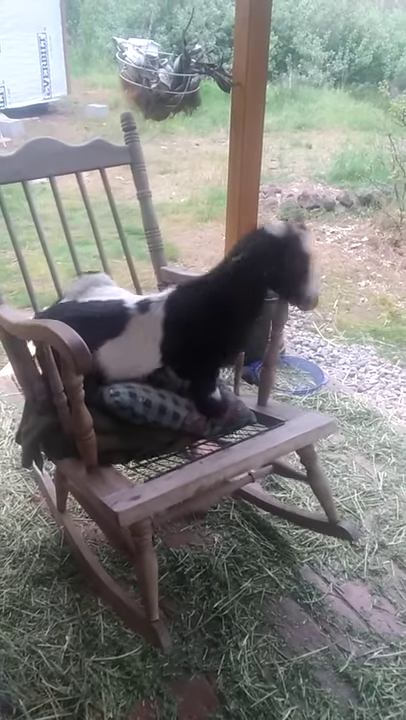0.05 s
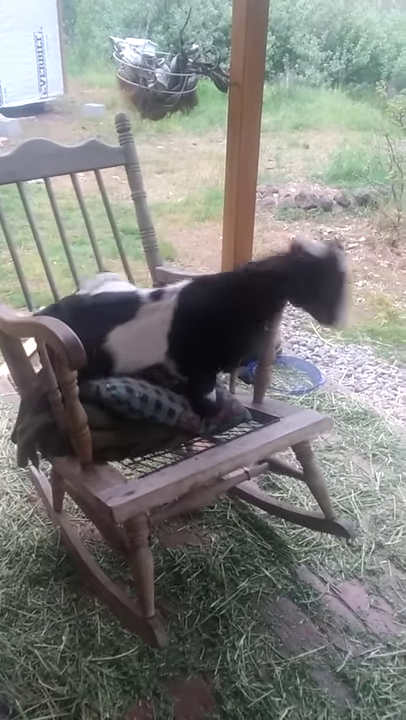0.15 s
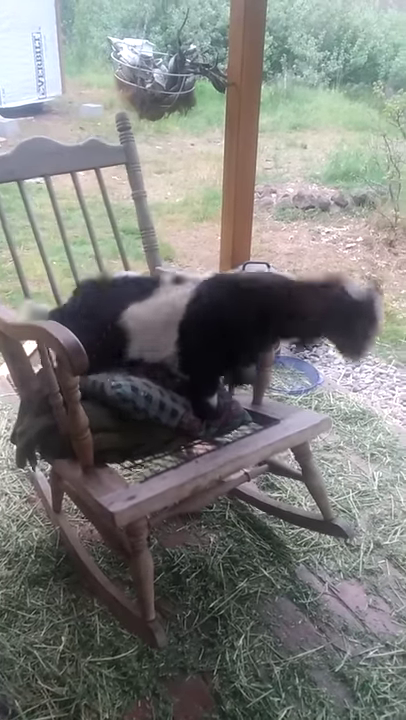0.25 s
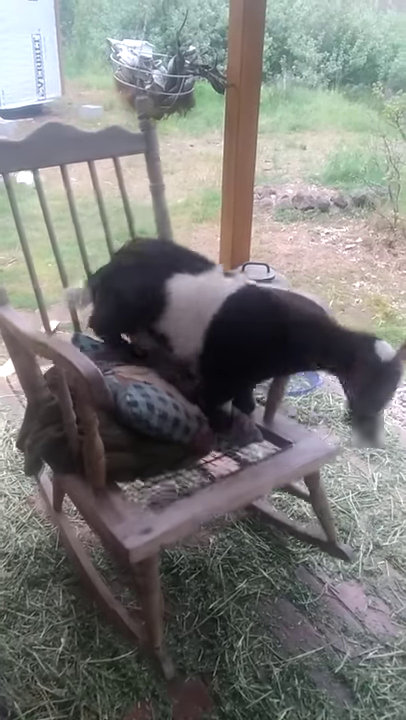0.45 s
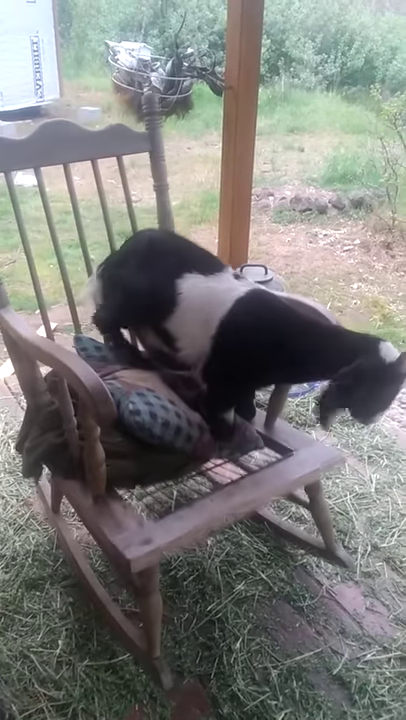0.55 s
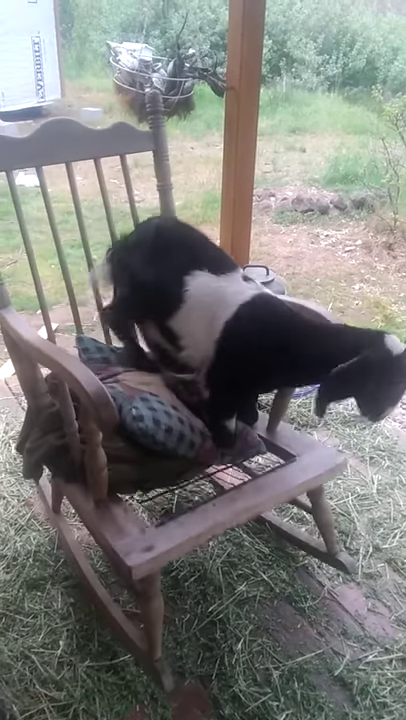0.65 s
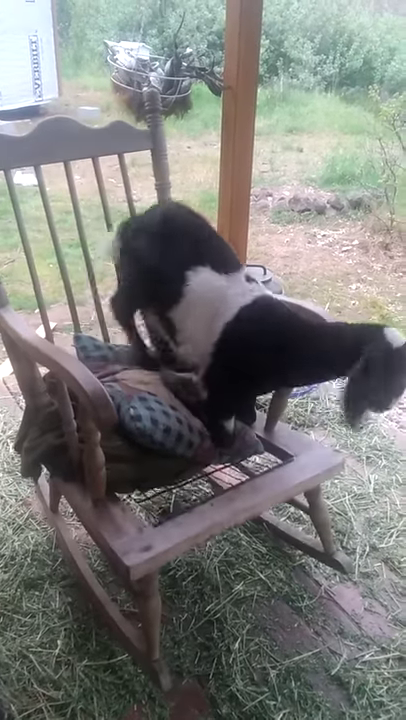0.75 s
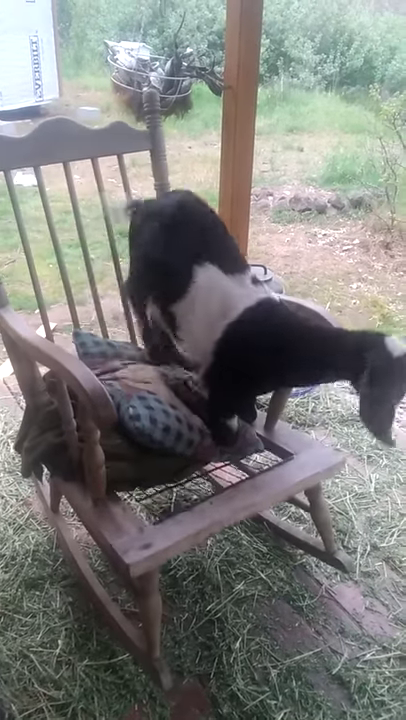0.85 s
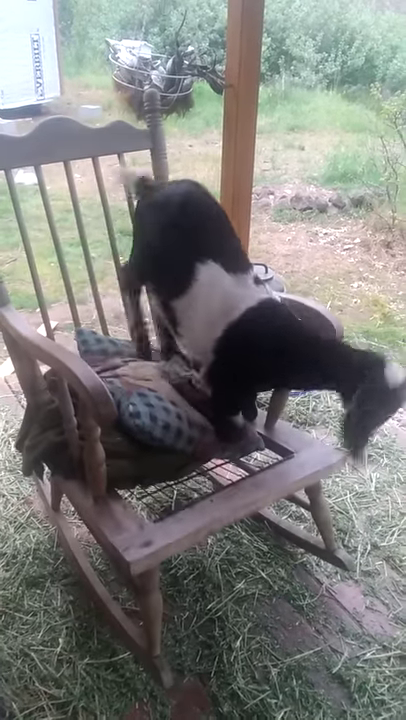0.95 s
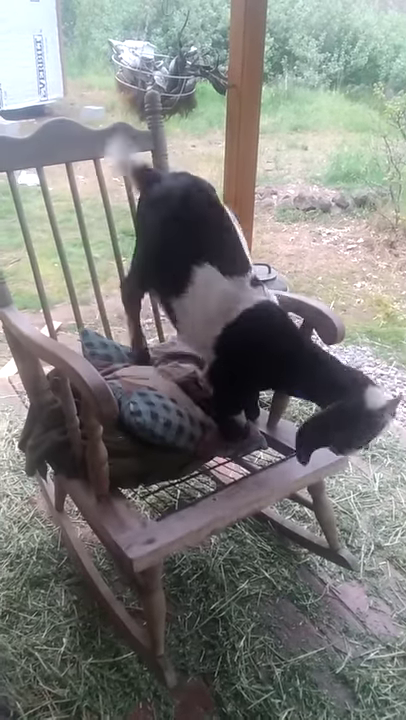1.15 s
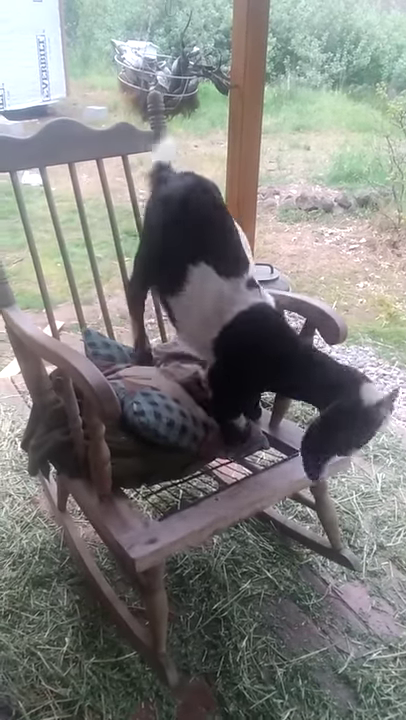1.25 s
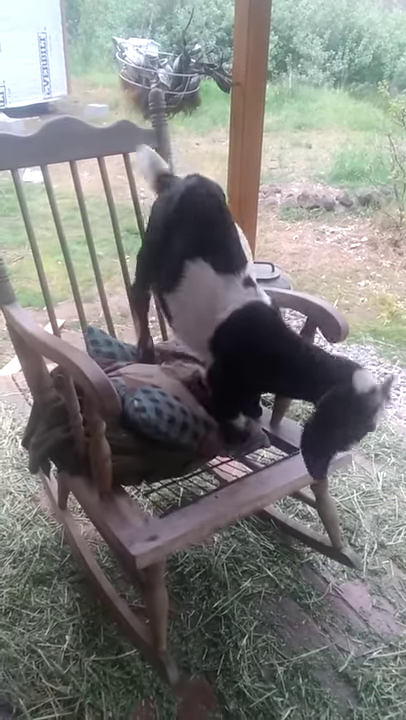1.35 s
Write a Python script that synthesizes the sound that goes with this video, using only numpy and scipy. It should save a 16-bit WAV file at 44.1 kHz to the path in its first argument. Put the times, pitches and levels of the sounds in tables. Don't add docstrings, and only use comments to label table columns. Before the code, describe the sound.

Goat hooves clatter hard on a wooden rocking chair, then small ticks and creaks amid steady crickets.

```python
import sys
import numpy as np
from scipy import signal
from scipy.fft import rfft, irfft
from scipy.io import wavfile

SR = 44100
rng = np.random.default_rng(int(sys.argv[2]) if len(sys.argv) > 2 else 0)


def field_ratio(decibels):
    return 10 ** (np.asarray(decibels, dtype=float) / 20)


def put_to_file(sound):
    columns = np.atleast_2d(sound).T
    safe = np.clip(columns, -1, 1)
    whole_steps = np.round(safe * 32767)
    wavfile.write(sys.argv[1], SR, whole_steps.astype(np.int16))


N = 61739
T = np.arange(N) / SR


def rms_one(x):
    return x / np.sqrt(np.mean(x ** 2) + 1e-20)


def curve(rows):
    return field_ratio(np.interp(T, *np.transpose(rows)))


def band(x, low_hz, high_hz, order=2):
    return signal.sosfilt(signal.butter(order, [low_hz, high_hz], "band", fs=SR, output="sos"), x)


def resonate(x, modes, order=1):
    out = 0
    for k, (pitch_hz, width_hz, level_db) in enumerate(modes):
        r = np.exp(-np.pi * max(width_hz, 8) / SR)
        poles = [1, -2 * r * np.cos(2 * np.pi * pitch_hz / SR), r * r]
        y = x
        for _ in range(order):
            y = signal.lfilter([1, 0, -1], poles, y) * (1 - r * r) / 2
        out = out + (-1) ** k * field_ratio(level_db) * y
    return out


# pitch_hz, density_db [dB per Hz]
HUSH_SPECTRUM = [(88, -30), (150, -7.5), (244, -12), (735, -11.5), (1950, -22.5), (4200, -33.5),
                 (5460, -60), (9240, -120)]


def hush():
    hz, density_db = np.transpose(HUSH_SPECTRUM)
    f = np.maximum(np.fft.rfftfreq(N, 1 / SR), 1)
    gain = field_ratio(np.interp(np.log(f), np.log(hz), density_db)) * (f < 6000)
    return field_ratio(-77.5) * rms_one(irfft(rfft(rng.standard_normal(N)) * gain, N))


# time_s, level_db
CHORUS = [(0, -49), (.13, -65.5), (.22, -69.5), (.33, -57.5), (.52, -64), (.65, -72), (.85, -59.5),
          (1.0, -73.5), (1.1, -75), (1.15, -52), (1.27, -72.5), (1.4, -59.5)]


def far_chorus():
    return curve(CHORUS) * field_ratio(0.5) * rms_one(band(rng.standard_normal(N), 5150, 5438, order=3))


# time_s, level_db
LOAD = [(0, -78.5), (.13, -91), (.18, -57.5), (.3, -40), (.45, -52), (.62, -54), (.75, -59), (.95, -64.5),
        (1.18, -64), (1.25, -58), (1.33, -40.5), (1.4, -57.5)]
# pitch_hz, width_hz, level_db
GROUND = [(58, 27, 0), (100, 39, -4), (155, 24, -3.5)]


def rumble():
    return curve(LOAD) * rms_one(band(resonate(rng.standard_normal(N), GROUND), 46, 220))


def cricket(strokes, pitch_hz, sag_hz, length_s, echo_db):
    out, blur = 0, 0
    for start_s, peak_db in strokes:
        detune, phase = rng.standard_normal(2)
        u = np.clip((T - start_s) / length_s, 0, 1)
        turns = length_s * ((pitch_hz + 25 * detune) * u - sag_hz * (u * u - u) / 2)
        out = out + field_ratio(peak_db) * np.sin(np.pi * u) * np.sin(2 * np.pi * turns + 3 * phase)
        t = np.maximum(T - start_s - .005, 0)
        blur = blur + field_ratio(peak_db + echo_db) * (1 - np.exp(-t / .006)) * np.exp(-t / 0.023)
    return out + blur * rms_one(band(rng.standard_normal(N), pitch_hz - 80, pitch_hz + 220, order=3))


def chirps(rows, gap_s):
    strokes = []
    for start_s, count, peak_db in rows:
        for k in range(round(count)):
            strokes.append((start_s + k * gap_s, peak_db + 2 * rng.standard_normal()))
    return strokes


# centre_s, peak_db
NEAR = [(0.0149, -44.5), (0.0503, -41.5), (0.0772, -46), (0.0922, -41.5), (0.2673, -46), (0.2862, -51),
        (0.3177, -45.5), (0.3556, -40.5), (0.39, -44.5), (0.4354, -48), (0.4783, -51.5), (0.5347, -48),
        (0.5686, -42.5), (0.6075, -42.5), (0.6474, -43), (0.6714, -53.5), (0.6953, -55), (0.7647, -52.5),
        (0.827, -46.5), (0.8699, -43), (0.9083, -45), (0.9847, -53.5), (1.0151, -54), (1.0585, -55),
        (1.1084, -49), (1.1483, -51.5), (1.1917, -44.5), (1.295, -52), (1.3354, -44), (1.3658, -42.5)]


def near_cricket():
    strokes = [(centre_s - .004, peak_db) for centre_s, peak_db in NEAR]
    return cricket(strokes, 5239, 291.5, 0.012, -8.5)


# start_s, strokes, peak_db
LOWEST = [
    (.072, 3, -64.5),
    (.42, 3, -65),
    (.765, 3, -60),
    (1.07, 1, -58),
    (1.112, 3, -64),
    (1.31, 3, -70),
]


def lowest_cricket():
    return cricket(chirps(LOWEST, 0.047), 4550, 170, 0.0104, -15.0)


# start_s, strokes, peak_db
HIGHER = [
    (.15, 4, -48.5),
    (.463, 4, -61),
    (.79, 4, -59.5),
    (1.102, 5, -56),
]


def higher_cricket():
    return cricket(chirps(HIGHER, .039), 5842, 280, 0.024, 2)


# start_s, strokes, peak_db
LOWER = [
    (.378, 4, -60),
    (.717, 4, -55),
    (.739, 3, -54.5),
    (1.025, 2, -58),
    (1.345, 1, -58),
    (1.375, 1, -56),
]


def lower_cricket():
    return cricket(chirps(LOWER, .043), 4850, 370, 0.0141, -9.0)


def struck_modes(rows, rise_cycles, flutter):
    out = 0
    for start_s, peak_db, pitch_hz, t60_s in rows:
        t = np.maximum(T - start_s, 0)
        waver = rms_one(band(rng.standard_normal(N), pitch_hz * .93, pitch_hz * 1.3))
        ring = np.sin(2 * np.pi * pitch_hz * t) + flutter * waver
        rise = 1 - np.exp(-t * pitch_hz / rise_cycles)
        out = out + field_ratio(peak_db - 60 * t / t60_s) * rise * ring
    return out


# start_s, peak_db, pitch_hz, t60_s
PIPS = [(.183, -45.5, 1360, 0.14), (.148, -69, 3010, 0.075), (.797, -52, 315, 0.056),
        (.926, -70.5, 2895, 0.097), (.94, -69, 2700, 0.074), (1.024, -51.5, 518.6, 0.12),
        (1.045, -61.5, 578, 0.19), (1.04, -60, 283, 0.18), (1.045, -73, 3250, .04),
        (1.086, -64, 1440, 0.053), (1.094, -63, 1644, 0.11), (1.18, -64, 1380, 0.088),
        (1.182, -72, 3200, 0.25)]


def spindle_pips():
    return struck_modes(PIPS, 2.7, .35)


SPLIT_HZ = [200, 1000, 2250, 4700]


def rattle(rows, body, broad_db, tail_s, order=1):
    rise_s, contacts_per_s, spread_db, tail_db = 0.0019, 6000, 2, -17.5
    strength = field_ratio(spread_db * np.minimum(rng.exponential(1, N), 2))
    contacts = rms_one((rng.random(N) < contacts_per_s / SR) * strength)
    out = 0
    for k in range(3):
        def voice(x):
            return band(resonate(x, body, order) + field_ratio(broad_db) * x, SPLIT_HZ[k], SPLIT_HZ[k + 1], order=4)

        push = tail = 1e-9
        for row in rows:
            start_s, level_db, fall_s = row[0], row[1 + k], row[4]
            t = np.maximum(T - start_s, 0)
            push = push + field_ratio(level_db) * (1 - np.exp(-t / rise_s)) * np.exp(-t / fall_s)
            tail = tail + field_ratio(level_db + tail_db) * (1 - np.exp(-t / fall_s)) * np.exp(-t / tail_s)
        scatter = rng.standard_normal(N)
        drive = push * contacts * rng.choice([-1, 1], N) + tail * scatter
        out = out + voice(drive) / np.std(voice(scatter))
    return 2 * out


# start_s, low_db, mid_db, high_db, fall_s
SQUEAKS = [
    (.153, -77.5, -81.5, -78.5, .01),
    (.172, -89.5, -70, -78.5, 0.0073),
    (.181, -79.5, -56, -60, 0.012),
    (.194, -68.5, -63.5, -64, 0.0097),
    (.212, -74, -63, -78.5, 0.02),
    (.228, -71, -58.5, -65, 0.016),
]
# pitch_hz, width_hz, level_db
BACK = [(472, 80, -11.5), (695, 43, 1.5), (1360, 110, -2.5), (1560, 50, -4), (2020, 70, -0.5),
        (2700, 70, 1.5), (2751, 60, 1), (3200, 120, -10), (3423, 60, -9), (3737, 220, -16)]


def back_squeaks():
    return rattle(SQUEAKS, BACK, -26, .02)


# start_s, peak_db, pitch_hz, t60_s
THUDS = [(.16, -58, 90, 0.22), (.185, -55.5, 64, 0.189), (.3, -54.5, 145, 0.25), (.335, -46, 266, 0.079),
         (.25, -33.5, 157.8, 0.32), (.256, -27, 121.2, 0.11), (.3605, -26, 107.8, 0.08),
         (.372, -34, 63.2, 0.39), (.398, -33, 146.6, 0.19), (.4135, -24.5, 110.3, 0.025),
         (.585, -50, 155, 0.63), (.61, -47, 60.6, 0.12), (1.235, -45.5, 62.6, 0.3),
         (1.275, -30.5, 135.4, 0.068), (1.293, -38, 58, 0.19), (1.312, -30, 100, 0.034),
         (1.33, -54.5, 56.4, 0.22)]


def rocker_thuds():
    return struck_modes(THUDS, 0.13, 0.16)


# start_s, low_db, mid_db, high_db, fall_s
KNOCKS = [(.243, -29, -33.5, -48.5, 0.0052), (.2495, -31.5, -31, -46.5, 0.0099),
          (.2565, -36.5, -40, -42, 0.0036), (.266, -38, -33.5, -32.5, 0.011),
          (.274, -43.5, -32, -39, 0.0061), (.286, -40, -45.5, -45.5, 0.0071), (.297, -43, -56, -63, .01),
          (.35, -38.5, -49, -57, 0.0036), (.3615, -49, -39.5, -42.5, 0.0024),
          (.375, -42.5, -43.5, -56.5, 0.016), (.393, -44, -41.5, -50, 0.002), (.451, -47, -42, -51, 0.0084),
          (.466, -68, -53, -58, 0.009), (.49, -87, -69, -71.5, 0.039)]
# pitch_hz, width_hz, level_db
FRAME = [(417, 67, -17), (708.5, 52, 2.5), (1134, 70, -16), (1176, 49, 2.5), (1550, 180, -0.5),
         (1864, 61, 4), (2097, 88, -0.5), (2385, 70, 6.5), (2603, 130, 6), (2895, 130, 10), (3586, 110, 2),
         (4370, 73, -12), (4480, 100, -17)]


def hoof_knocks():
    return rattle(KNOCKS, FRAME, -7, 0.035)


# start_s, peak_db, pitch_hz, t60_s
IMPACTS = [(.2432, -28.5, 472, 0.0337), (.2478, -23.5, 635, 0.03), (.2501, -17.5, 800, .01),
           (.2532, -22.5, 1300, .008), (.2665, -26, 3650, .03), (.2665, -37, 4490, .04),
           (.254, -19, 2520, 0.017), (.2668, -24, 2950, 0.02), (.2688, -13, 1660, 0.011),
           (.2732, -13, 2860, 0.022), (.2785, -23, 1560, 0.029), (.352, -42, 710, 0.044),
           (.378, -30.5, 640, 0.078), (.376, -31, 1247, 0.058), (.456, -51, 1445, 0.15),
           (.455, -48.5, 719, .09), (1.269, -40, 593, 0.21), (1.35, -43.5, 296.4, 0.21)]


def hoof_impacts():
    return struck_modes(IMPACTS, 0.29, 0.11)


# start_s, low_db, mid_db, high_db, fall_s
BUZZES = [
    (.545, -112, -59.5, -60, 0.012),
    (.57, -93, -95.5, -77, 0.0067),
    (.587, -77, -80, -64, 0.0094),
    (.619, -99, -70, -73, 0.015),
]
# pitch_hz, width_hz, level_db
STRAND = [(1760, 140, -12), (2060, 40, -6), (2500, 120, 8), (2820, 86, 8), (3680, 80, -21)]


def strand_buzzes():
    return rattle(BUZZES, STRAND, -20, 0.044)


# start_s, low_db, mid_db, high_db, fall_s
TICKS = [
    (.646, -89.5, -57.5, -48.5, 0.012),
    (.672, -95, -64.5, -60, 0.0068),
    (.688, -86.5, -84, -68, 0.017),
    (.716, -92, -78.5, -71.5, 0.007),
]
# pitch_hz, width_hz, level_db
WIRE = [(1350, 76, -18), (1830, 100, -0.5), (2160, 89, -5.5), (2370, 110, 5), (2655, 170, 1.5),
        (2635, 65, 3), (3520, 130, -7.5), (3650, 170, -12), (3830, 74, -13), (4135, 44, -7.5)]


def seat_ticks():
    return rattle(TICKS, WIRE, -40, .03)


# start_s, low_db, mid_db, high_db, fall_s
CREAKS = [(1.2, -66, -60.5, -70.5, 0.01), (1.211, -60, -54, -66.5, 0.00775),
          (1.229, -57, -51.5, -62.5, 0.01115), (1.246, -82, -57, -65, 0.028),
          (1.2685, -52.5, -52.5, -60, 0.024), (1.283, -50.5, -57, -68, 0.014),
          (1.296, -53, -52.5, -65.5, 0.011), (1.311, -51, -61, -52, 0.0066),
          (1.33, -55, -65, -63.5, 0.0098), (1.35, -62, -64.5, -69, 0.032), (1.392, -63, -55, -74, 0.025)]
# pitch_hz, width_hz, level_db
JOINTS = [(278.8, 140, -14), (428, 49, -7), (588, 125, -4.5), (799, 80, -18.5), (1092, 68, -17.5),
          (1380, 195, -4.5), (1660, 146, 1), (1865, 170, -2), (2067, 92, -0.5), (2700, 310, -0.5),
          (2904, 74, -12), (3196, 146, -7), (3685, 226, -6.5), (4170, 190, -13.5)]


def joint_creaks():
    return rattle(CREAKS, JOINTS, -37, 0.029, order=2)


def scene():
    singers = near_cricket() + lowest_cricket() + higher_cricket() + lower_cricket()
    yard = hush() + far_chorus() + singers
    chair = back_squeaks() + strand_buzzes() + seat_ticks() + joint_creaks() + spindle_pips()
    hooves = hoof_knocks() + hoof_impacts()
    ground = rumble() + rocker_thuds()
    return (yard + chair + hooves + ground)[None]


def top_cut(x):
    return signal.sosfilt(signal.butter(12, 15730, fs=SR, output="sos"), x)


def record(dry):
    mic_top_hz, hiss_db = 6047, -79
    rounded = 0.19 * np.tanh(dry / 0.22)
    low_pass = signal.cheby2(12, 60, mic_top_hz * 1.074, fs=SR, output="sos")
    mix = signal.sosfilt(low_pass, rounded) + field_ratio(hiss_db) * rng.standard_normal(dry.shape)
    return top_cut(mix)


dry = scene()
out = record(dry)
put_to_file(out)
```